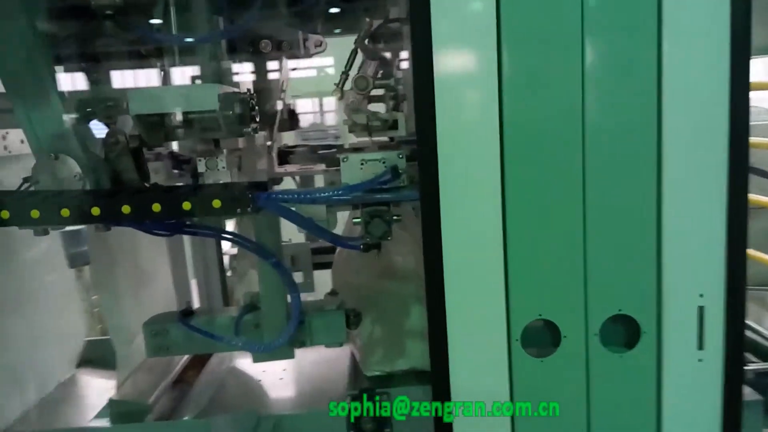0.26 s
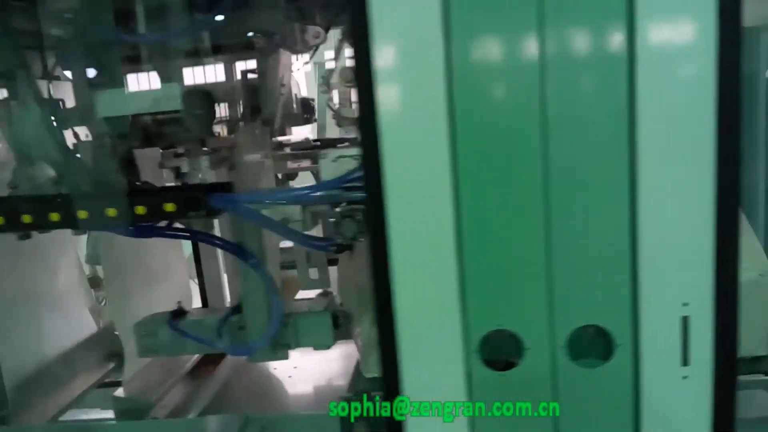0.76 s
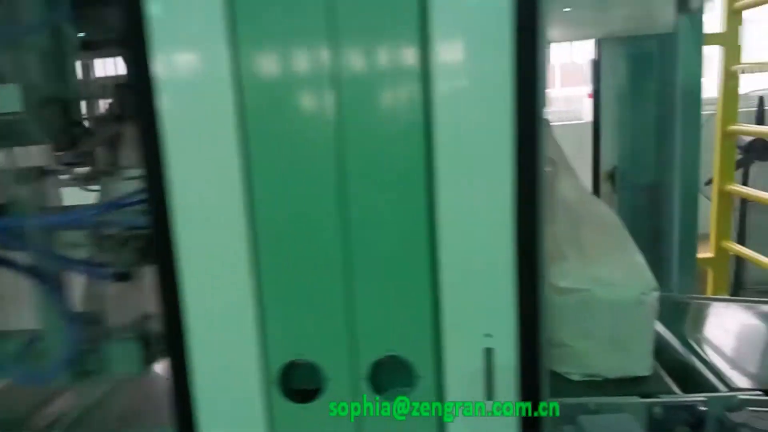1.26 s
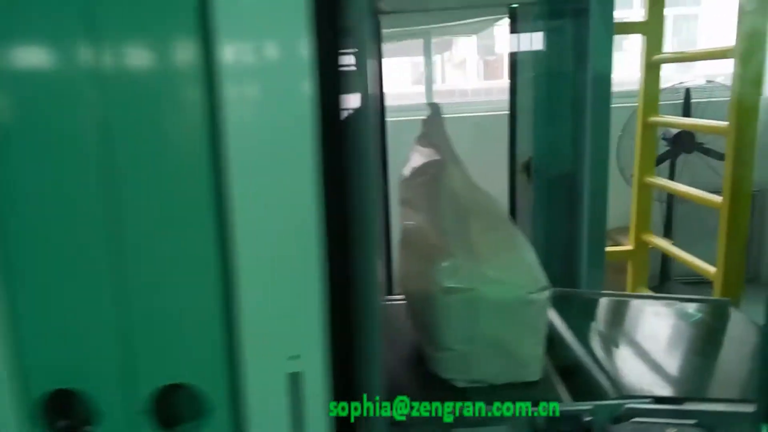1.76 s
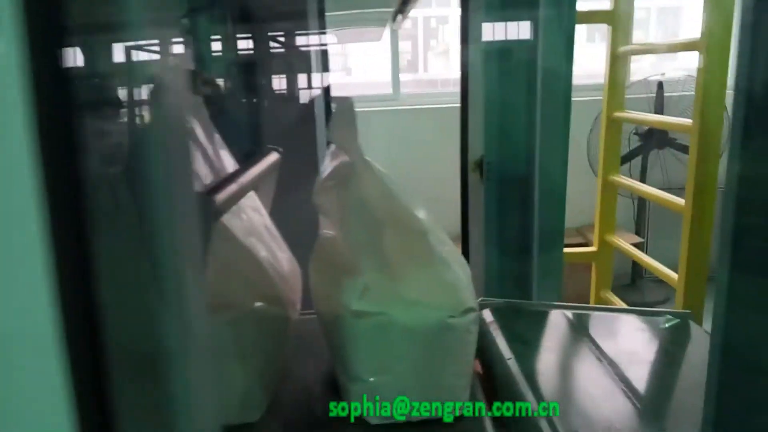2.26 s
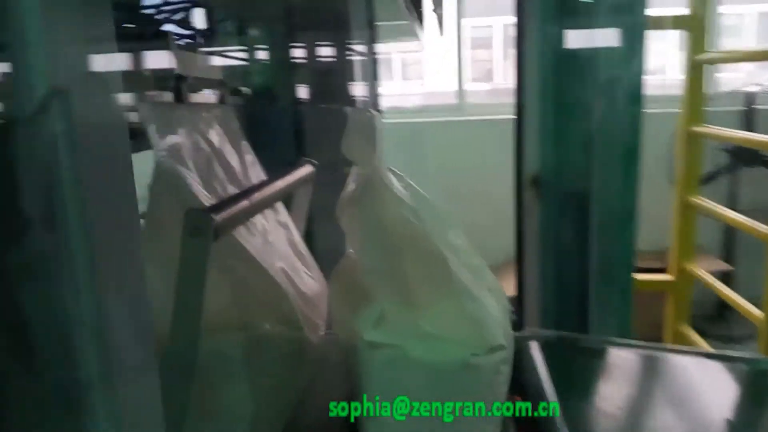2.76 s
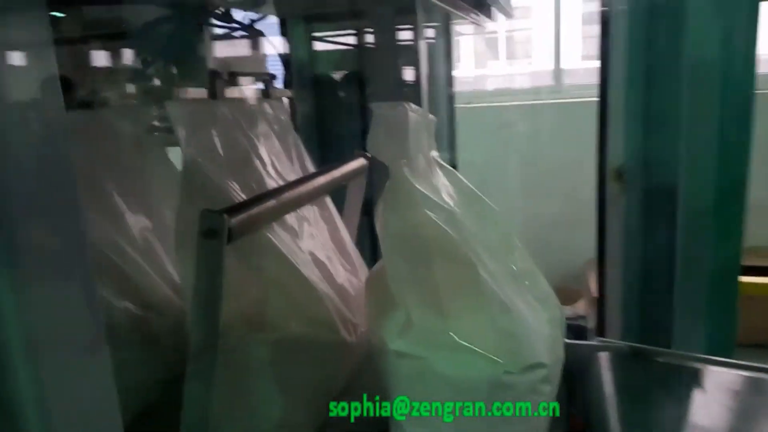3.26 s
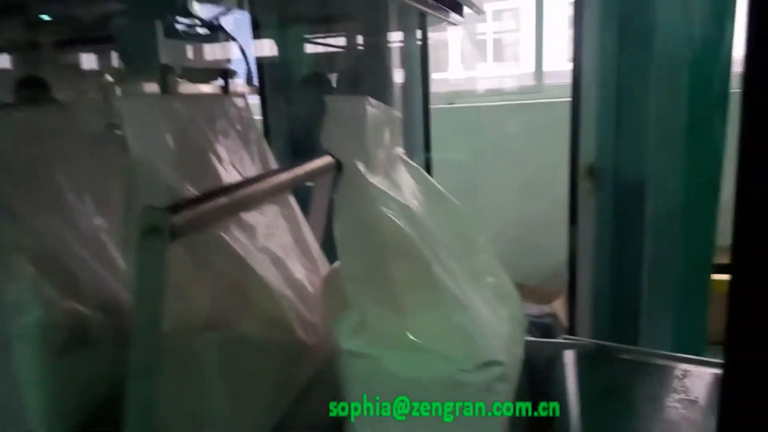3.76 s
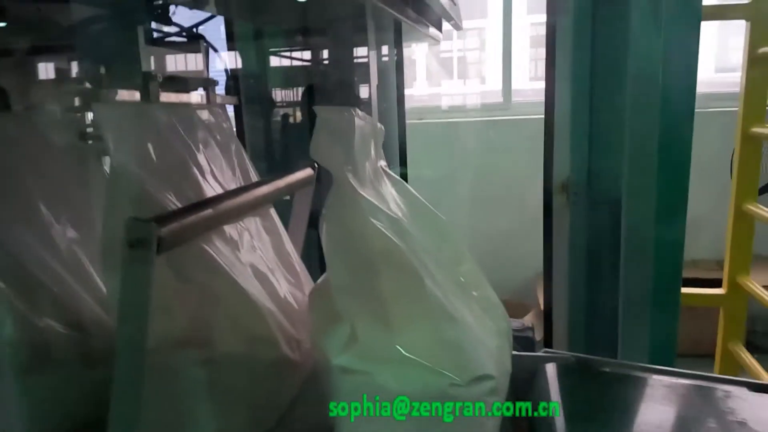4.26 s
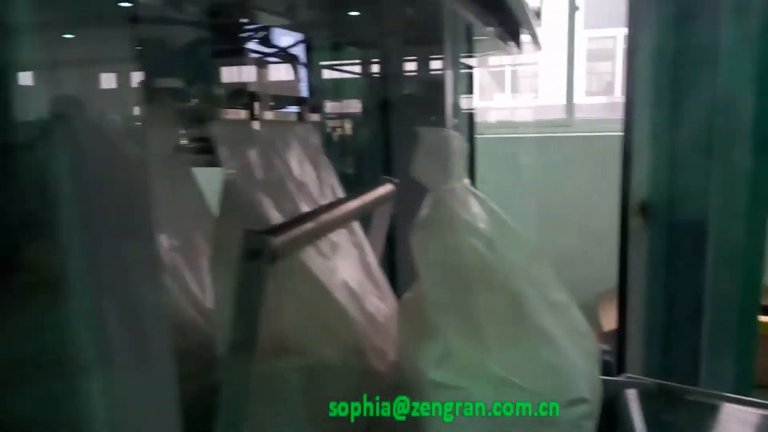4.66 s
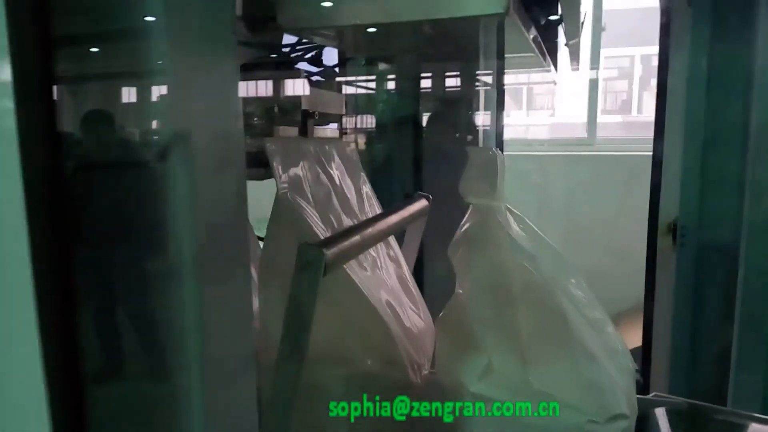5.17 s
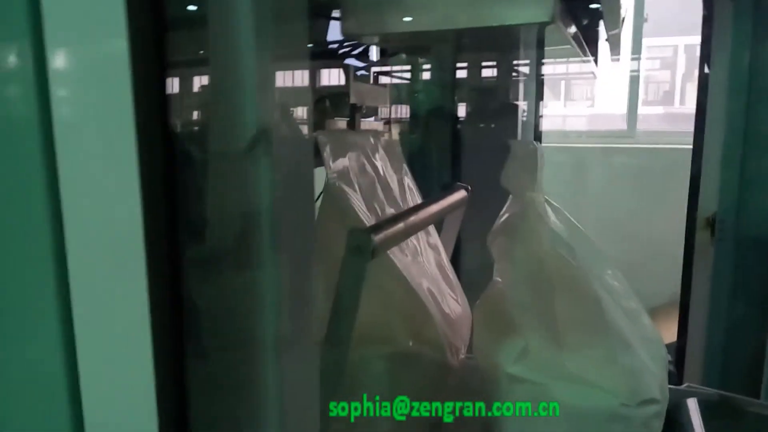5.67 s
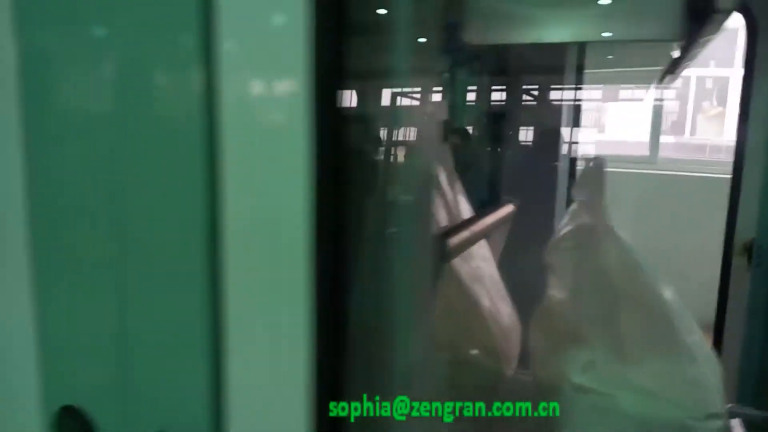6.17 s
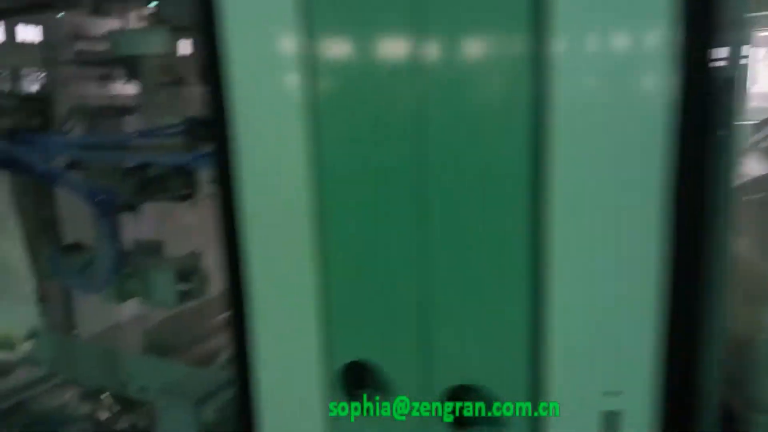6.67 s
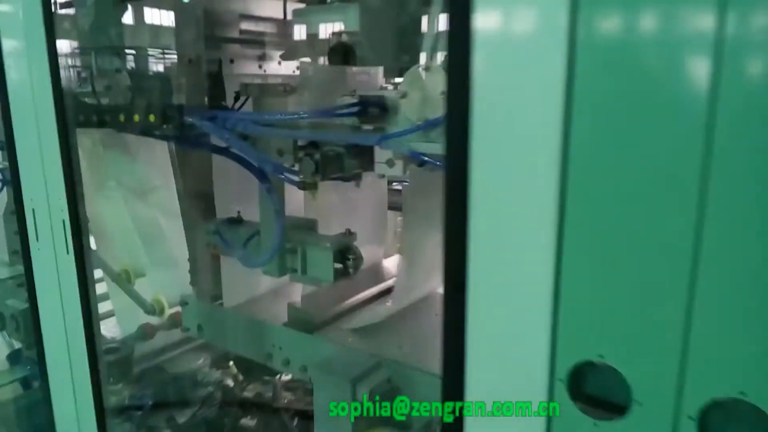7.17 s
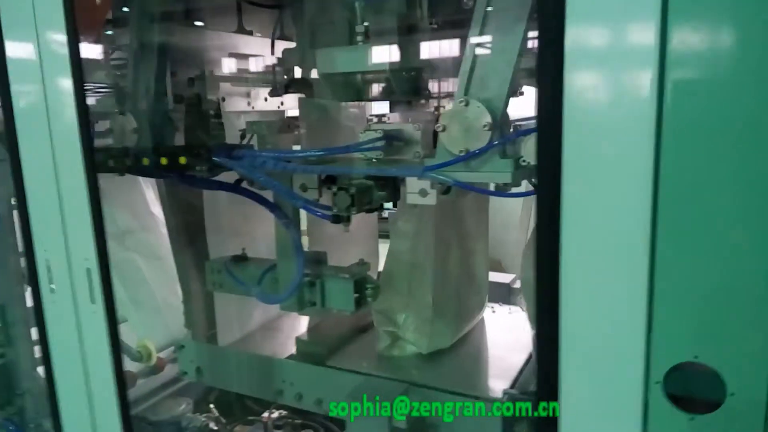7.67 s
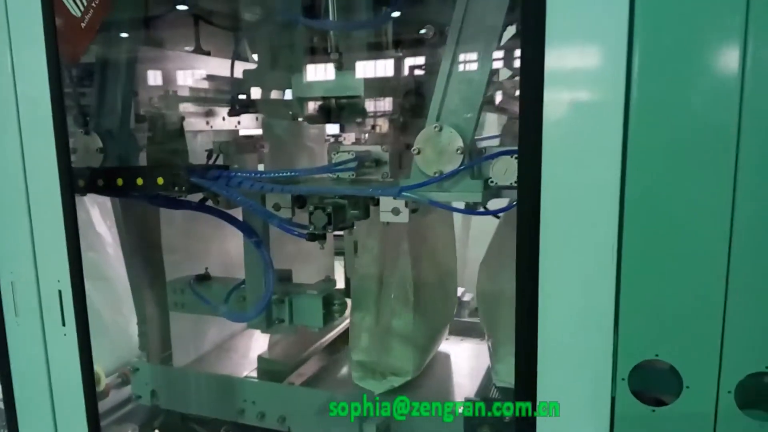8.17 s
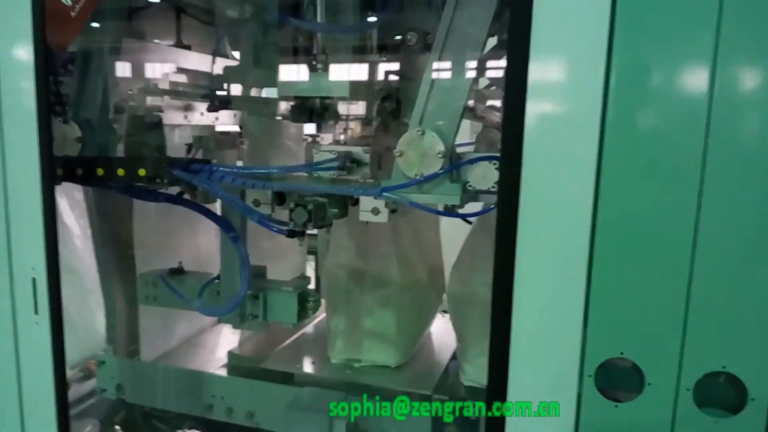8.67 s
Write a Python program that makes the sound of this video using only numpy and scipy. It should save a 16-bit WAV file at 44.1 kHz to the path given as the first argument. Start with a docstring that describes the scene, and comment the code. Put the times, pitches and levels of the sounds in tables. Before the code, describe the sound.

A bagging machine runs continuously in a factory hall, heard close by with the hall's reverberation and equal in both channels. A low cabinet drone throbs about 15 times a second, with buzzing panels, fine rattle, churning drives, narrow motor whines, faint floor rumble and a steady hiss around 6 kHz. From 0.4 to 2.2 s bag film faintly crackles; small puffs and a knock come at 0.65 and 1 s, while one panel swells. Moving towards the conveyor, the buzz changes colour and a loose joint chirps more clearly. A clack falls at 2.6 s, a sharp air blow-off at 3.05 s, a tiny squeak at 3.8 s. The leak eases; a thud, groan and softer vent come at 5 s. Returning, a louder, wider air burst erupts around 7.15-7.4 s, with a hard clack at 7.45 s. Short groans near 8.4 s precede light puffs as the machine keeps running.

```python
"""Bagging machine in a factory hall

Heard while walking from the clamp station to the bag conveyor and back. A vibrator shakes the frame about 15
times a second: cabinet throb, panel buzz and rattle are tones at its multiples, and a loose joint chirps.
Motors whine and servos whirr as narrow noise, with one high ping; drives churn and compressed air hisses as
coloured noise. Valves vent in puffs and two loud blow-offs, clamps knock, film crackles, and two low tones beat
in the floor."""
import sys
import numpy as np
from scipy import signal
from scipy.fft import irfft, next_fast_len
from scipy.io import wavfile

SR = 44100
rng = np.random.default_rng(int(sys.argv[2]) if len(sys.argv) > 2 else 0)


def to_wav(s):
    """Save 16-bit WAV."""
    ch = np.atleast_2d(s).T  # columns
    pcm = np.round(np.clip(ch, -1, 1) * 32767)  # PCM
    wavfile.write(sys.argv[1], SR, pcm.astype(np.int16))


N = 393372
TIME = np.arange(N) / SR   # seconds

# Path of the walk. Each row: time in seconds, place from 0 at the clamp station to 1 at the conveyor.
WALK_PATH = [(0.0, 0.019), (0.8, 0.21), (1.5, 0.38), (2.2, 0.6), (3.0, 0.84), (4.0, 1.0), (5.0, 0.9),
             (6.1, 0.65), (6.7, 0.47), (7.3, 0.33), (7.9, 0.2), (8.92, 0.15)]
# Floor tones. Each row: frequency in Hz, level in dB at the clamp station, level in dB at the conveyor.
FLOOR_TONES = [(24.5, -50, -42.5), (26.4, -49, -43.5)]
# Level of the churning drives. Each row: time in seconds, level in dB between 1 and 2.5 kHz.
CHURN_LEVEL = [(0, -27), (1.4, -26.5), (2.1, -29), (3.0, -27.5), (3.9, -29), (6.1, -28.5), (6.6, -29),
               (8.92, -27.5)]
# Churn spectrum. Each row: frequency in Hz, relative dB per Hz at the clamp station, the same at the conveyor.
CHURN_SPECTRUM = [(20, -14, -13), (48, -14, -25), (75, -3, -2), (109, 4, 7), (203, 2, 6.5), (314, 5.5, 1),
                  (447, -0.5, 5), (634, 6, 5.5), (880, 6.5, 4), (1240, -3, -1.5), (1590, 0.5, -0.5),
                  (2060, -5.5, -5.5), (3280, -8.5, -8), (6000, -18, -16.5)]
# Steady air leak. Each row: time in seconds, level in dB between 4.8 and 7.5 kHz.
LEAK_LEVEL = [(0, -22.5), (2.8, -22.5), (4.2, -25), (4.9, -24), (5.8, -28), (6.9, -27.5), (7.7, -24.5),
              (8.92, -27.5)]
# Muffler hiss spectrum. Each row: frequency in Hz, relative level in dB per Hz.
HISS_SPECTRUM = [(2000, -22), (3300, -19), (4300, -5), (5000, -5.5), (5500, -1.5), (5900, 0.5), (6600, -1),
                 (6950, -6), (7500, -10), (8100, -19.5), (9300, -24.5), (11500, -29), (14000, -26),
                 (16000, -29)]
# Bright jet spectrum. Each row: frequency in Hz, relative level in dB per Hz.
JET_SPECTRUM = [(1500, -12), (3200, -15), (4700, 8), (6000, 13.5), (7200, -14), (8500, -3), (11000, 2),
                (13000, 1.5), (16000, -3)]
# Low rush spectrum. Each row: frequency in Hz, relative level in dB per Hz.
RUSH_SPECTRUM = [(300, -16), (700, 0), (1300, 5), (2000, 2), (3000, 1), (4000, 3), (5000, -27)]
# Valve openings. Each row: start in seconds, rise in seconds, time from start to shutting in seconds,
# then the levels in dB before the sag of muffler hiss, bright jet and low rush.
VALVE_VENTS = [(.65, 0.016, 0.045, -23.5, -50, -38), (1.02, 0.039, 0.07, -19.5, -45, -32),
               (2.55, .06, 0.16, -20, -49, -37), (3.04, 0.013, 0.14, -11.5, -30.5, -41),
               (5.06, .04, 0.34, -21.5, -46, -31), (7.01, .04, 0.097, -22, -45, -34),
               (7.155, .06, 0.14, -11, -25, -19), (7.3, 0.045, .11, -15.5, -29, -24),
               (7.44, 0.011, 0.018, -16.5, -47, -17), (7.68, 0.068, 0.16, -28, -46, -27),
               (8.25, 0.031, 0.15, -26.5, -47, -44), (8.84, 0.029, .06, -26, -45, -41)]
# Snaps of the bag film. Each row: start in seconds, level in dB.
FILM_SNAPS = [(.37, -22), (.92, -24), (1.26, -26), (1.4, -27), (2.16, -28)]
# Clamp knocks. Each row: start in seconds, then the levels in dB of thud, clack and air spit.
CLAMP_KNOCKS = [(.655, -19, -22, -31), (1.06, -37, -30, -38), (2.59, -27, -18, -44), (3.05, -31, -39, -40),
                (3.26, -26, -40, -55), (5.07, -17, -39, -42), (7.455, -19.5, -10, -40),
                (8.26, -38, -34.5, -42)]
# Thud spectrum. Each row: frequency in Hz, relative level in dB per Hz.
THUD_SPECTRUM = [(35, -15), (65, -3), (120, -4), (300, -6), (700, -40)]
# Clack spectrum. Each row: frequency in Hz, relative level in dB per Hz.
CLACK_SPECTRUM = [(150, -23), (300, -10), (650, 11.5), (1500, 0.5), (3500, -3.5), (6500, 3), (9000, -47)]
# Motor and gear tones. Each row: frequency in Hz, half width in Hz, level in dB at the clamp station,
# level in dB at the conveyor.
MOTOR_WHINES = [(389, 9.8, -44, -33), (598, 13, -28, -36), (812, 13, -37, -41.5), (984, 9.8, -39, -43.5),
                (1136, 11, -37, -46), (1380, 22, -47, -47.5), (1538, 24, -49, -43)]
# Whirrs of the servos and one high ping. Each row: centre time in seconds, length in seconds, frequency in Hz,
# # half width in Hz, level in dB.
WHIRRS_AND_PING = [(3.783, .05, 5300, 160, -22.5), (4.95, 0.093, 386, 10, -19.5),
                   (7.423, 0.48, 254, 12, -26.5), (8.385, 0.14, 236, 20, -23), (8.5, 0.11, 605, 31, -19)]
# Weaker lines of the frame. Each row: frequency in Hz, level in dB per line.
RATTLE_LINES = [(40, -63), (75, -51.5), (110, -52), (250, -56), (400, -41), (700, -43.5), (950, -54),
                (1250, -54.5), (1550, -52.5), (2000, -63)]
# Joint resonances. Each row: frequency in Hz, half width in Hz, relative level in dB at the clamp station,
# relative level in dB at the conveyor.
JOINT_RINGS = [(2775, 200, -58, -28), (4414, 280, -29, -27), (6460, 180, -50, -33.5)]
# Standing waves of the panels. Each row: shake order, relative level in dB at the clamp station,
# relative level in dB at the conveyor, place of a node, node spacing in places.
PANEL_WAVES = [(17, -46, -36.5, 0.38, 0.86), (18, -42, -33, 0.14, 0.71), (20, -45.5, -36.5, 0.59, 1.3),
               (22, -40.5, -38, 0.68, 0.87), (23, -33.5, -30, 0.54, 2.7), (24, -32, -33.5, 0.39, 1.9),
               (25, -30.5, -32.4, 0.6, 1.93), (27, -39.5, -37, 0.51, 0.68), (29, -47, -40, 0.69, 1.26),
               (30, -37.5, -45, 0.3, 0.41), (31, -44.5, -30, 0.7, 0.68), (32, -40.6, -45, 0.16, 1.07),
               (33, -42, -30, 0.56, 2), (34, -34, -49, 0.31, 1.1), (35, -44, -31.5, 0.61, 0.5),
               (36, -35.5, -27.5, 0.55, 1.94), (37, -34.5, -28, 0.71, 1.36), (38, -42, -48, 0.3, 0.35),
               (41, -52, -39.5, 0.02, 0.95), (42, -44, -48, 0.19, 0.53), (43, -32, -68.2, 0.02, 0.39),
               (44, -38, -38, 0.03, 0.79), (47, -41.1, -46, 0.99, 1.4), (51, -41.5, -40.2, 0.095, 1.15),
               (53, -54, -36, 0.05, 0.72), (55, -42, -35, 0.85, 1.05), (56, -35.3, -42, 0.057, 0.59),
               (59, -38.5, -41, 0.99, 1.3)]
# Standing waves of the cabinet at orders 11, 12 and 13. Each row: relative level in dB at the clamp station,
# relative level in dB at the conveyor, place of a node, node spacing in places, echo strength from 0 to 1.
CABINET_WAVES = [(-25.5, -28.5, 0.013, 1.7, 0.95), (-23, -18, 0.4, 0.82, 0.41),
                 (-34, -29.5, 0.41, 0.81, 0.6)]

SHAKE_HZ = 14.692
DOOR_FROM, DOOR_TO = 0.144, 0.6   # places where the cabinet door divides the two sides
PANEL_ECHO = 0.69   # strength of the reflection behind the panels' standing waves
SWELL_S, SWELL_LENGTH_S = 0.93, 1.7   # one panel rings up for a while
SWELL_HZ, SWELL_HALF_WIDTH_HZ, SWELL_DB = 529, 20, 7
VENT_SAG_DB_PER_S = 11   # pressure falls from the opening on
HISS_T60_S, JET_T60_S, RUSH_T60_S = 1, 0.29, 1   # decay after shutting, on top of the sag
CHATTER_START_DB, CHATTER_FADE_DB_PER_S = 1.5, 1.1   # the loose joint slowly settles
CUTOFF_HZ = 15550


def from_db(db):
    """Decibels to gain."""
    return np.exp(np.log(10) * np.asarray(db) / 20)


def in_time(rows):
    """A (seconds, value) curve at every sample."""
    return np.interp(TIME, *np.transpose(rows))


def between(clamp, conveyor, place):
    """A value that changes linearly along the walk."""
    return clamp + (conveyor - clamp) * place


def drift(rate_hz, at=TIME):
    """Random steps joined by straight lines, with a spread of about 1."""
    steps = rng.standard_normal(int(N / SR * rate_hz) + 2)
    return np.interp(at * rate_hz, np.arange(len(steps)), steps) * np.sqrt(3 / 2)


def shaped_noise(gain_at, band_hz=(0, SR)):
    """Noise with a given gain per frequency and rms 1 inside the band."""
    size = next_fast_len(N)
    hz = np.arange(size // 2 + 1) * SR / size
    white = rng.standard_normal(len(hz)) + 1j * rng.standard_normal(len(hz))
    bins = gain_at(hz) * white
    inside = (hz >= band_hz[0]) & (hz <= band_hz[1])
    band_power = np.sum(np.abs(bins[inside]) ** 2)
    return irfft(bins, size)[:N] * size / np.sqrt(2 * band_power)


def coloured(spectrum, band_hz=(0, SR), ripple_db=0):
    """Noise with a tabled spectrum that falls away beyond its ends; near reflections ripple it."""
    at, level_db = np.transpose(spectrum)
    knots_hz = np.arange(0, SR / 2, 45)
    ripple = ripple_db * rng.standard_normal(len(knots_hz)) * np.clip(knots_hz / 1000 - 0.5, 0, 1)

    def gain_at(hz):
        ends = np.minimum(1, hz / at[0]) ** 2 / np.maximum(1, hz / at[-1]) ** 2
        smooth_db = np.interp(np.log(hz + 1), np.log(at), level_db)
        return ends * from_db(smooth_db + np.interp(hz, knots_hz, ripple))

    return shaped_noise(gain_at, band_hz)


def resonant(hz, half_width_hz):
    """Noise passed twice through one resonance; rms 1."""
    return shaped_noise(lambda f: 1 / (1 + ((f - hz) / half_width_hz) ** 2))


def standing_wave(place, clamp_db, conveyor_db, node, spacing, echo):
    """Complex gain of a tone and its reflection, which oppose at evenly spaced nodes along the walk."""
    reflection = echo * np.exp(2j * np.pi * (place - node) / spacing)
    return from_db(between(clamp_db, conveyor_db, place)) * (1 - reflection)


def rumble(side):
    """Two slow shafts shake the floor and beat with each other."""
    out = 0
    for hz, clamp_db, conveyor_db in FLOOR_TONES:
        tone = np.sqrt(2) * np.sin(2 * np.pi * (hz * TIME + rng.random()))
        out = out + from_db(between(clamp_db, conveyor_db, side)) * tone
    return out


def churn(side, ripple_db=2.5):
    """The blurred roar of belts and drives, filling the hall: coloured noise, cross-faded by side."""
    spectrum = np.array(CHURN_SPECTRUM)
    clamp = coloured(spectrum[:, [0, 1]], (1000, 2500), ripple_db)
    conveyor = coloured(spectrum[:, [0, 2]], (1000, 2500), ripple_db)
    return from_db(in_time(CHURN_LEVEL)) * (np.sqrt(1 - side) * clamp + np.sqrt(side) * conveyor)


def venting(levels_db, t60_s):
    """Power of the escaping air: each valve opens, sags with the pressure, shuts and dies away in the hall."""
    power = 0
    for (start_s, rise_s, open_s, *_), db in zip(VALVE_VENTS, levels_db):
        age_s = np.maximum(TIME - start_s, 0)
        fall_db = VENT_SAG_DB_PER_S * age_s + 60 * np.maximum(age_s - open_s, 0) / t60_s
        power = power + (np.minimum(age_s / rise_s, 1) * from_db(db - fall_db)) ** 2
    return power


def air(side, flutter_db=0.3, surge_db=0.16, ripple_db=2.0, throb_db=0.66, throb_crest_turns=0.4):
    """Mufflers hiss around 6 kHz, the leak pulsing with the shake; a venting valve adds a jet and a lower rush."""
    hiss_db, jet_db, rush_db = np.transpose(VALVE_VENTS)[3:]
    clamp, conveyor = [coloured(HISS_SPECTRUM, (4800, 7500), ripple_db) for _ in range(2)]
    throb = throb_db * np.cos(2 * np.pi * (SHAKE_HZ * TIME - throb_crest_turns))
    leak = from_db(in_time(LEAK_LEVEL) + throb)
    hiss = np.sqrt(1 - side) * clamp + np.sqrt(side) * conveyor
    hiss = hiss * np.sqrt(leak ** 2 + venting(hiss_db, HISS_T60_S))
    jet = coloured(JET_SPECTRUM, (9000, 15000), ripple_db) * np.sqrt(venting(jet_db, JET_T60_S))
    rush = coloured(RUSH_SPECTRUM) * np.sqrt(venting(rush_db, RUSH_T60_S))
    return (hiss + jet + rush) * from_db(flutter_db * drift(300) + surge_db * drift(18))


def crackles(hz=6800, half_width_hz=1700, fade_s=0.006):
    """The plastic film snaps faintly as the bags move: short decaying bursts of resonant noise."""
    envelope = 0
    for start_s, db in FILM_SNAPS:
        envelope = envelope + from_db(db) * (TIME >= start_s) * np.exp(-np.abs(TIME - start_s) / fade_s)
    return envelope * resonant(hz, half_width_hz)


def knocks(thud_t60_s=0.29, clack_t60_s=0.63, spit_t60_s=0.5, rise_s=0.006):
    """A clamp closes: a thud in the frame, a clack and a spit of air, all dying away in the hall."""
    parts = [(THUD_SPECTRUM, thud_t60_s), (CLACK_SPECTRUM, clack_t60_s), (JET_SPECTRUM, spit_t60_s)]
    out = 0
    for k, (spectrum, t60_s) in enumerate(parts):
        envelope = 0
        for start_s, *levels_db in CLAMP_KNOCKS:
            age_s = np.maximum(TIME - start_s, 0)
            decay = np.exp(-np.log(1000) * age_s / t60_s)
            envelope = envelope + from_db(levels_db[k]) * np.minimum(age_s / rise_s, 1) * decay
        out = out + envelope * coloured(spectrum)
    return out


def motors(side):
    """Steady narrow-band whines, and servo whirrs and a ping that swell and fade."""
    out = 0
    for hz, half_width_hz, clamp_db, conveyor_db in MOTOR_WHINES:
        out = out + from_db(between(clamp_db, conveyor_db, side)) * resonant(hz, half_width_hz)
    for centre_s, length_s, hz, half_width_hz, db in WHIRRS_AND_PING:
        swell = np.exp(-(2 * (TIME - centre_s) / length_s) ** 2)
        whirr = resonant(hz, half_width_hz) * swell
        level_fix = np.sqrt(np.sum(swell ** 2) / np.sum(whirr ** 2))   # same energy for any draw
        out = out + from_db(db) * whirr * level_fix
    return out


def rattle(side, unsteady_db=3.2, size=4096, count=136):
    """Every turn repeats the same faint rattle; each side of the machine has its own."""
    at, level_db = np.transpose(RATTLE_LINES)
    gains = from_db(np.interp(np.log(np.arange(count) * SHAKE_HZ + 1), np.log(at), level_db))
    gains[[0, 10, 11, 12, 13, 14] + [row[0] for row in PANEL_WAVES]] = 0   # cabinet and panels carry these
    position = SHAKE_HZ * TIME % 1 * size
    out = 0
    for share in (1 - side, side):
        lines = gains * np.exp(2j * np.pi * rng.random(count))
        one_turn = irfft(lines, size) * size / np.sqrt(2)
        out = out + np.sqrt(share) * np.interp(position, np.arange(size), one_turn)
    return out * from_db(unsteady_db * drift(14))


def joint(place, touch_clamp_turns=0.2, touch_conveyor_turns=0.3, sharpness=3.4, uneven_db=0.9,
          tonal_share=0.4, scatter=0.14):
    """A loose joint rubs once in each turn and chirps, each time at a slightly different pitch."""
    turns = SHAKE_HZ * TIME - between(touch_clamp_turns, touch_conveyor_turns, place)
    nearest = np.round(turns).astype(int)
    rub = np.exp(sharpness * (np.cos(2 * np.pi * turns) - 1) / 2)
    since_touch_s = (turns - nearest) / SHAKE_HZ
    ring = 0
    for hz, half_width_hz, clamp_db, conveyor_db in JOINT_RINGS:
        offsets = rng.standard_normal(int(SHAKE_HZ * N / SR) + 10)   # one per turn
        pitch_hz = hz + scatter * half_width_hz * offsets[nearest]
        chirp = np.sqrt(2 * tonal_share) * np.sin(2 * np.pi * pitch_hz * since_touch_s)
        scrape = np.sqrt(1 - tonal_share) * resonant(hz, half_width_hz)
        ring = ring + from_db(between(clamp_db, conveyor_db, place)) * (chirp + scrape)
    return ring * rub * from_db(CHATTER_START_DB - CHATTER_FADE_DB_PER_S * TIME + uneven_db * drift(14))


def panels(place, level_db=0.47, unsteady_db=0.5, sway_db=1.0, path_cycles=0.28, step=200):
    """Sheet panels sing at multiples of the shake; each line varies as the walk crosses its standing wave."""
    coarse_s, where = TIME[::step], place[::step]
    swell_db = SWELL_DB * np.exp(-(2 * (coarse_s - SWELL_S) / SWELL_LENGTH_S) ** 2)
    out = 0
    for order, *wave in PANEL_WAVES:
        hz = order * SHAKE_HZ
        db = level_db + swell_db * np.exp(-((hz - SWELL_HZ) / SWELL_HALF_WIDTH_HZ) ** 2)
        db = db + unsteady_db * drift(9, coarse_s) + sway_db * drift(2.53, coarse_s)
        gain = np.abs(standing_wave(where, *wave, PANEL_ECHO)) * from_db(db)
        # the phase also shifts along the walk
        cycles = hz * TIME + rng.random() + path_cycles * rng.standard_normal() * place
        out = out + np.sqrt(2) * np.interp(TIME, coarse_s, gain) * np.sin(2 * np.pi * cycles)
    return out


def drone(place, side, crest_clamp_turns=0.29, crest_conveyor_turns=0.45, bend_clamp_cycles=-0.11,
          bend_conveyor_cycles=0.047, order_10_db=-36, order_14_db=-34, flanks_db=0.6, lean=0.012,
          unsteady_db=0.6):
    """Five shake orders around the cabinet resonance swell together once a turn, later at the conveyor."""
    turns = SHAKE_HZ * TIME - between(crest_clamp_turns, crest_conveyor_turns, side)
    turns = turns + lean * np.cos(2 * np.pi * turns)   # each swell rises faster than it falls
    below, centre, above = [np.abs(standing_wave(place, *row)) for row in CABINET_WAVES]
    # the resonance turns its flanks, so the dips never close fully
    bend = np.exp(2j * np.pi * between(bend_clamp_cycles, bend_conveyor_cycles, side))
    flanks = bend * from_db(flanks_db)
    top = from_db(order_14_db) * np.exp(1j * np.pi * side)   # past its node the top order is inverted
    gains = [from_db(order_10_db), below * flanks, centre, above * flanks, top]
    throb = sum(gain * np.exp(2j * np.pi * k * turns) for k, gain in enumerate(gains, -2))
    carrier = np.exp(2j * np.pi * (12 * SHAKE_HZ * TIME + rng.random()))   # order 12
    return np.sqrt(2) * (throb * carrier).real * from_db(unsteady_db * drift(5.1))


def scene():
    """All sources reach one microphone, alike in both channels."""
    place = in_time(WALK_PATH)
    side = np.clip((place - DOOR_FROM) / (DOOR_TO - DOOR_FROM), 0, 1)   # 0 clamp side of the door, 1 conveyor side
    hall = rumble(side) + churn(side) + air(side)
    handling = crackles() + knocks() + motors(side)
    vibrator = rattle(side) + joint(place) + panels(place) + drone(place, side)
    sound = hall + handling + vibrator
    return np.array([sound, sound])


def record(dry):
    """Peaks beyond full scale clip, then a steep low-pass cuts the top."""
    clipped = np.clip(dry, -1, 1)
    low_pass = signal.ellip(12, 0.1, 80, CUTOFF_HZ, fs=SR, output="sos")
    return signal.sosfilt(low_pass, clipped)


dry = scene()
out = record(dry)
to_wav(out)
```